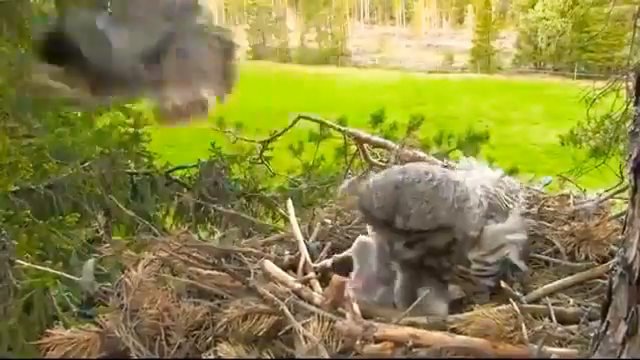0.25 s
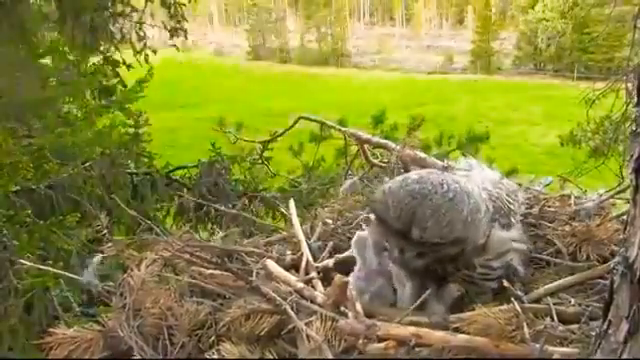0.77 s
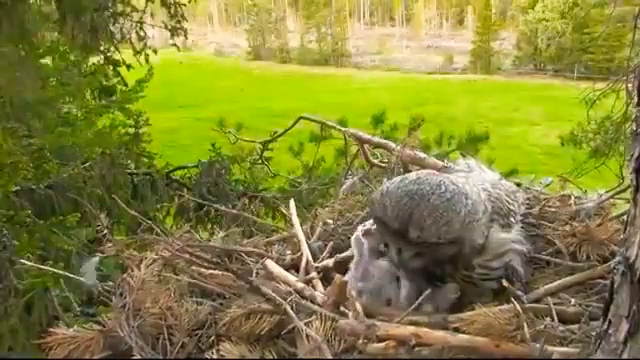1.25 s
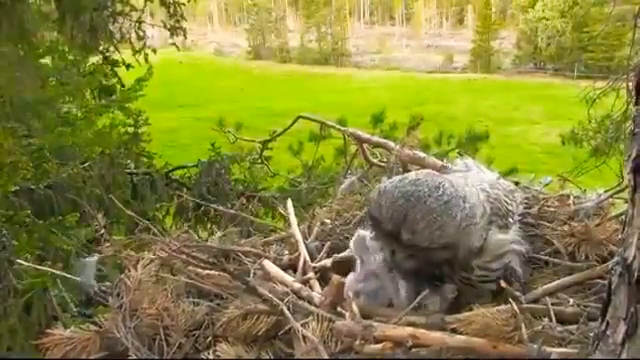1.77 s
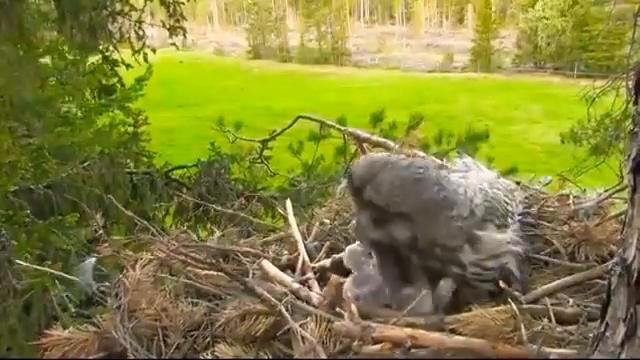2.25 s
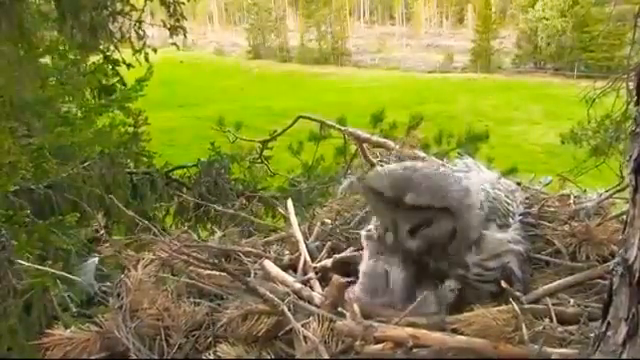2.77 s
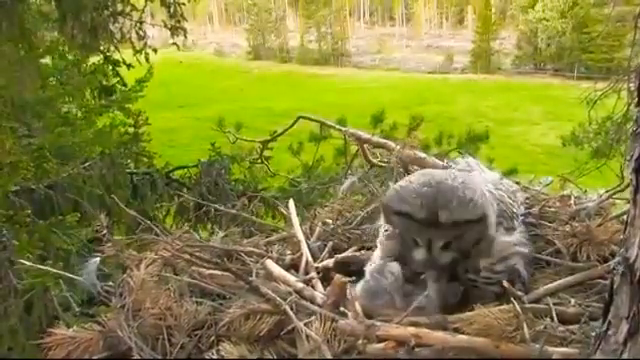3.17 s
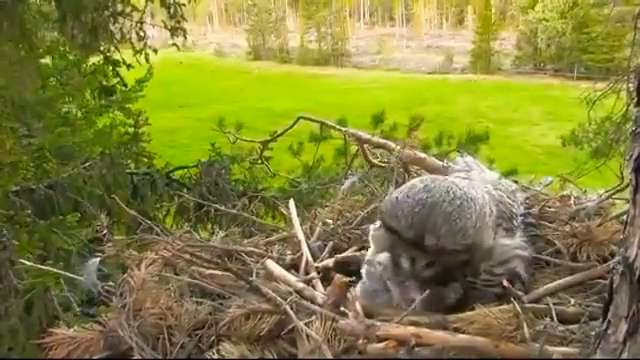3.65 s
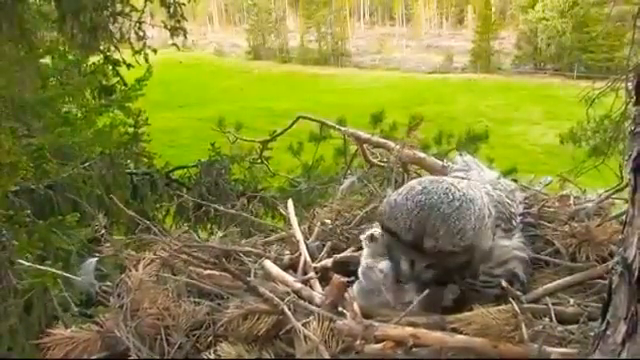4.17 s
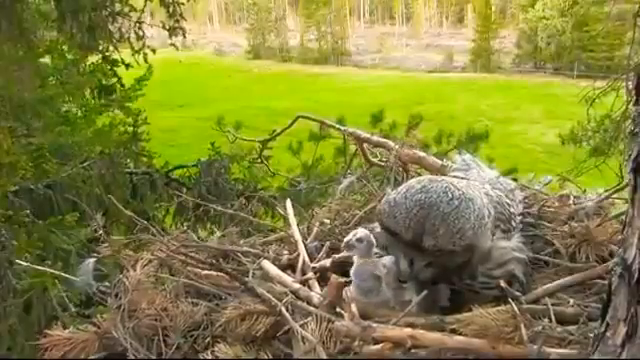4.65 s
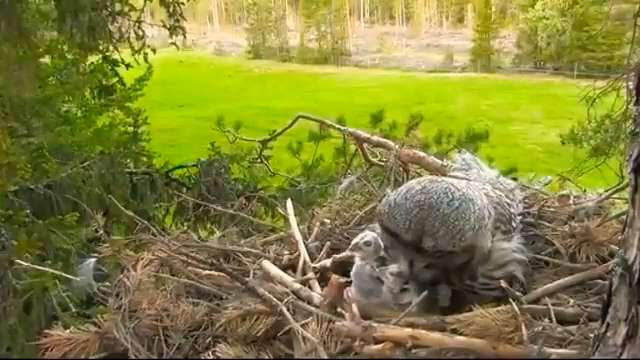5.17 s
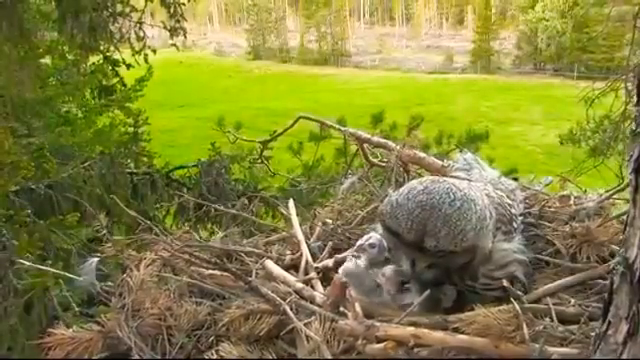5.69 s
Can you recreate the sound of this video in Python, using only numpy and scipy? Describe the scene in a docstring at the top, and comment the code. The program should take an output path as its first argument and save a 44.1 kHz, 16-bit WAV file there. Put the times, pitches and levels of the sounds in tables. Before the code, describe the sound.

Close, dry chick chatter and high rasping begging cries, with brief low wing buffets at the start, over a very quiet forest edge.

```python
"""A forest edge, close to a stick nest: owl chicks beg while an adult flies off, its wings pushing air onto the microphone.
A quick chitter of swooping squeaks and grunts runs, with gaps, through the first three seconds.
Arched whistles with turbulent rasp lie over it, some as hoarse screeches; reedy lower voices sound under or after
some calls or as short separate notes. Gusts and buffets are shaped low noise and short tones; reflections and short
tails set the birds among twigs and trunks. Nearly all of the sound is in the right channel."""
import sys
import numpy as np
from scipy import signal
from scipy.fft import rfft, irfft
from scipy.io import wavfile

SR = 44100
rng = np.random.default_rng(int(sys.argv[2]) if len(sys.argv) > 2 else 0)


def dump(signal):
    """Clip the signal to [-1, 1] and save it as 16-bit WAV at the path in sys.argv[1]."""
    limited = np.clip(np.atleast_2d(signal).T, -1, 1)
    pcm = np.round(limited * 32767).astype(np.int16)
    wavfile.write(sys.argv[1], SR, pcm)


N = 261292
TIME = np.arange(N) / SR
# source levels in dB stand ahead of the right channel's gain


def from_db(db):
    """Decibels to gain."""
    return 10 ** (np.asarray(db) / 20)


def rms_one(x):
    """Scale to unit rms."""
    return x / np.sqrt(np.mean(np.abs(x) ** 2) + 1e-20)


def at_hz(colour, hz):
    """Gain of a spectrum at the given frequencies."""
    points, db = np.transpose(colour)
    return from_db(np.interp(np.log(hz), np.log(points), db))


def noise(colour, size=N):
    """Noise with a given spectrum, falling away below its first point, rms 1."""
    bins = np.maximum(np.arange(size // 2 + 1) * SR / size, 1)
    gain = at_hz(colour, bins) * np.minimum(bins / colour[0][0], 1) ** 2
    return rms_one(irfft(rfft(rng.standard_normal(size)) * gain, size))


def wobble(rate_hz, size):
    """Random motion up to a given rate, rms 1."""
    sos = signal.butter(2, min(rate_hz, SR / 4), fs=SR, output="sos")
    run_in = SR // 10
    return rms_one(signal.sosfilt(sos, rng.standard_normal(size + run_in))[-size:])


def phase_of(hz):
    """Running phase of a moving pitch, from a random start."""
    return 2 * np.pi * (np.cumsum(hz) / SR + rng.random())


def swell(t, half_length):
    """A bell-shaped rise and fall about t = 0."""
    return np.exp(-.5 * (t / half_length) ** 2)


def step(t, duration_s):
    """A smooth step from 0 to 1 about t = 0."""
    return .5 + .5 * np.tanh(.5 * t / duration_s)


def ramp(t, duration_s):
    """1 at t = 0, easing to 0 after the given time."""
    return np.clip(1 - t / duration_s, 0, 1) ** 1.45


def stretch(start_s, length_s):
    """The samples that a sound spans, the time since its start, and its progress from -1/2 to 1/2."""
    t = TIME[:int(length_s * SR)]
    first = int(start_s * SR)
    return slice(first, first + len(t)), t, t / length_s - .5


def blend(share, *pairs):
    """Values part of the way between the two ends of each pair."""
    return [a + np.clip(share, 0, 1) * (b - a) for a, b in pairs]


def forest():
    """The quiet forest in the distance: steady noise, strongest in the lows."""
    # spectrum of the forest air: f/Hz, relative level per Hz/dB
    forest_colour = [(15, -30.5), (25, -9.5), (64, -8), (86, -4), (156, -2), (204, -11), (260, -8),
                     (340, -12.5), (421, -11), (631, -14.5), (703, -12.5), (945, -13.5), (2920, -33.5),
                     (10400, -40.5), (15500, -38)]
    return from_db(-59.5) * noise(forest_colour)


def swoop(t, squeak_hz, hurry, squeak_db, rasp_db):
    """One chitter note: a U of pitch whose overtones and hiss pass through the throat's resonances."""
    # throat resonances: f/Hz, relative level per Hz/dB
    throat = [(250, 1), (620, -19), (1000, -5), (1600, -5), (2100, -10.5), (3000, -10), (3600, -2.5),
              (4600, 1.5), (5400, -4.5), (6200, -16.5), (7300, -15.5), (8300, -26), (9200, -38.5),
              (15000, -36)]
    hurry = np.clip(hurry, 0, 1)
    # pairs are (drawn-out note, hurried note)
    dive_lead_s, drop_octaves = blend(hurry, (0.016, .0165), (0.17, 1.7))
    squeak_half_s, peak_db, glide_db = blend(hurry, (0.0079, 0.0029), (0, 3), (-25, -22))
    hiss_in_db, hiss_squeak_db, hiss_out_db = blend(hurry, (0.5, 5), (-2.5, -4), (-4, -5))

    # the pitch dives onto the squeak, drops below it and climbs out again, sagging throughout
    dive = 2.05 * step(-t - dive_lead_s, .0018)
    sag = 5.5 * t  # octaves, at 5.5 per second
    drop = drop_octaves * step(t - 0.0061, 0.001608)
    climb = (drop_octaves + 2.1) * step(t - 0.024, .0028)
    hz = squeak_hz * 2 ** (dive - sag - drop + climb)
    jitter = .045 * (1 + .5 * hurry)
    phase = phase_of(hz * (1 + jitter * wobble(600, len(t))))

    overtones = np.zeros(len(t))
    for k in range(2, 8):
        flicker = from_db(3 * wobble(120, len(t)))
        audible = k * hz < SR / 2
        overtones += np.sin(k * phase) * at_hz(throat, k * hz) * audible * flicker
    hiss_share = 0.26
    rasp = (np.sqrt(1 - hiss_share) * from_db(-4) * overtones
            + np.sqrt(hiss_share) * noise(throat, size=len(t)))
    rasp = rasp * rms_one(from_db(3.7 * wobble(253, len(t))))

    # the tone peaks on the squeak and stays faint on the way in and out
    tone_level = from_db(peak_db) * swell(t, squeak_half_s) + from_db(glide_db)
    # the rasp bursts as the pitch dives, on the squeak and as it climbs
    rasp_level = (from_db(hiss_in_db) * swell(t + .011, 0.0057)
                  + from_db(hiss_squeak_db) * swell(t, squeak_half_s)
                  + from_db(hiss_out_db) * swell(t - .02, 0.0057))
    tone = np.sqrt(2) * np.sin(phase) * from_db(squeak_db) * tone_level
    note = tone + rasp * from_db(rasp_db) * rasp_level
    # the note spans 28 ms before its squeak to 37 ms after
    return note * (1 - ramp(t + 0.028, 0.016)) * (1 - ramp(.037 - t, 0.01205))


def grunt(t, half_s, hz):
    """A few slow cycles of the slack membrane, sagging in pitch, each letting out a tiny puff."""
    # spectrum of a puff: f/Hz, relative level per Hz/dB
    puff_colour = [(400, 2), (1200, 4), (2200, -15), (4500, -11.5), (6500, -19), (12000, -43)]
    phase = phase_of(hz * np.exp(-0.088 * np.clip(t / half_s, -3, 3)))
    puffs = np.maximum(np.cos(phase), 0) ** 6 * noise(puff_colour, size=len(t))
    puff_level = from_db(-11) * (hz / 300) ** 4  # stronger in a higher grunt
    return np.sqrt(2) * (np.cos(phase) + puff_level * puffs) * swell(t, half_s)


def chitter():
    """Runs of swoops, about ten a second, each with a low grunt of its own."""
    # chitter notes: squeak t/s, squeak f/Hz, hurry (0-1), squeak level/dB, rasp level/dB,
    # grunt delay/s, grunt half-length/s, grunt mid f/Hz, grunt level/dB
    chitter_notes = [(-.012, 1430, 0.99, -30.5, -28, 0.049, 0.0023, 259, -53),
                     (0.088, 1368, 1, -45, -29, .011, 0.0014, 337, -20.5),
                     (0.189, 1340, 0.96, -36.5, -34.5, 0.015, 0.0048, 284, -44),
                     (0.244, 1300, 1, -43.5, -49, 0.022, 0.0034, 217.4, -33.5),
                     (0.604, 1064, 0.88, -44.5, -52.5, -.004, 0.0022, 240.3, -28),
                     (0.698, 1300, 0.83, -35, -37, 0.0098, 0.004, 282, -44.5),
                     (.801, 1371, 0.94, -35.5, -30.5, 0.014, 0.004, 290, -38),
                     (0.905, 1396, 1, -32.5, -34, 0.011, 0.0025, 299, -35),
                     (1.009, 1381, 0.97, -33.5, -32, 0.014, 0.0042, 290.3, -36.5),
                     (1.116, 1380, 1, -35, -29.5, 0.012, 0.0044, 284, -36.5),
                     (1.223, 1409, 1, -36.5, -30.5, 0.015, 0.0029, 310, -33),
                     (1.328, 1380, 1, -34.5, -32, 0.013, 0.0031, 307, -31),
                     (1.435, 1344, 0.95, -36, -30.5, 0.017, 0.0032, 309.5, -32),
                     (1.54, 993, 0.04, -40, -50, 0.041, 0.011, 231, -34),
                     (2.094, 1186, 0, -38, -37.5, 0.011, 0.014, 326, -74),
                     (2.198, 1154, 0.01, -34.5, -43, -0.0023, 0.011, 330, -57),
                     (2.298, 1198, 0.16, -33.5, -43.5, -0.00012, 0.011, 347, -54),
                     (2.399, 1267, 0.11, -34, -39, -0.007, 0.0068, 304.3, -50),
                     (2.501, 1273, 0.19, -36.5, -40.5, 0.018, 0.0073, 277.2, -49.5),
                     (2.608, 1285, 0.45, -35.5, -42, 0.017, 0.0044, 267, -43),
                     (2.714, 1268, 0.32, -34.5, -39, 0.016, 0.0047, 245.6, -52.5),
                     (2.815, 1275, 0.3, -35.5, -39, 0.01, 0.0099, 280, -52.5),
                     (2.923, 1280, 0.23, -36, -48, .014, 0.0053, 270, -45),
                     (3.027, 1013, 0.08, -37, -46, 0.05, 0.0081, 198.4, -48)]
    out = np.zeros(N)
    for s, hz, hurry, squeak_db, rasp_db, delay_s, half_s, low_hz, low_db in chitter_notes:
        near = np.abs(TIME - s) < .1
        t = TIME[near] - s
        out[near] += swoop(t, hz, hurry, squeak_db, rasp_db)
        out[near] += from_db(low_db) * grunt(t - delay_s, half_s, low_hz)
    return out


def wings():
    """Low gusts rise quickly and die away, with a buffet where a wing stroke's air hits the microphone."""
    # gusts of air over the microphone: peak t/s, level/dB, time to fall 60 dB/s
    gusts = [(0, -49, 2.3), (.34, -35.5, 1.45), (.61, -40, 0.22), (5.06, -49.5, 1.12)]
    # wing buffets: t/s, f/Hz, half-length/s, level/dB
    buffets = [(.005, 288, 0.0014, -29.5), (0.382, 125, 0.0024, -26.5), (0.456, 69.5, 0.008, -33),
               (0.488, 51.75, 0.0032, -27), (0.616, 67.4, 0.0074, -24)]
    # spectrum of the draught: f/Hz, relative level per Hz/dB
    draught_colour = [(15, -11.5), (30, 3.5), (52, 3), (85, -7.5), (130, -16.5), (250, -24.5), (600, -56)]
    draught = np.zeros(N)
    for s, db, t60 in gusts:
        rise = swell(np.minimum(TIME - s, 0), 0.037)
        draught += from_db(db - 60 * np.maximum(TIME - s, 0) / t60) * rise
    out = draught * noise(draught_colour)
    for s, hz, half_s, db in buffets:
        tone = np.sin(2 * np.pi * (hz * TIME + rng.random()))
        out += np.sqrt(2) * from_db(db) * swell(TIME - s, half_s) * tone
    return out


def undertone(row):
    """A reedy lower voice on a shallow arch of pitch, whose overtones flicker and change as it is pressed."""
    # harmonics of the voice from the fundamental up, overtones ahead of their boost: level/dB
    harmonics_db = [-2, -2, -2, -5, -6, -31]
    start_s, length_s, start_hz, end_hz, arch_hz, level_db, swell_db, boost_db, boost_change_db = row
    span, t, progress = stretch(start_s, length_s)
    hz = start_hz + (end_hz - start_hz) * t / length_s + arch_hz * (1 - (2 * progress) ** 2)
    size, out = len(hz), np.zeros(N)
    phase = phase_of(hz * (1 + 0.031 * wobble(391, size)))
    pressed_db = boost_db + boost_change_db * progress
    voice = np.zeros(size)
    for k, db in enumerate(harmonics_db, 1):
        if k > 1:
            db = db + pressed_db + 4 * wobble(65, size)
        voice += np.sin(k * phase) * from_db(db)
    edge_s = 0.0017
    edges = (1 - ramp(t, edge_s)) * (1 - ramp(length_s - t, edge_s))
    out[span] = np.sqrt(2) * voice * from_db(level_db + swell_db * progress) * edges
    return out


def beg(row):
    """An arched whistle, mostly thinner at its top; roughness shakes it, and turbulent rasp surrounds it."""
    # spectra of the rasp in a clear and in a hoarse call: f/Hz, relative level per Hz/dB
    peep_rasp = [(700, -7), (1300, -3), (1900, -7), (2900, 8), (4500, 10.5), (6500, 2), (8000, -0.5),
                 (8800, -14), (10400, -10.5), (11300, -37), (13000, -16), (15500, -29.5)]
    screech_rasp = [(300, -14.5), (700, -11.5), (1200, -4), (2600, -8.5), (4500, -8.5), (6000, 10),
                    (7800, 9), (8800, -2.5), (10400, -2), (11400, -7), (14000, -1), (15700, -20.5)]
    (start_s, rise_s, fall_s, start_hz, top_hz, end_hz, steepness, hoarse, attack_s,
     tone_db, tone_swell_db, thin_db, accent_db, surge_db, hiss_db, hiss_swell_db) = row
    hoarse = np.clip(hoarse, 0, 1)
    # pairs are (clear call, hoarse call)
    release_s, = blend(hoarse ** 3, (0.0075, 0.059))
    rough, rough_growth = blend(hoarse, (.3, .48), (.4, -.2))
    chaos_share, rasp_lag = blend(hoarse, (0.069, 0.43), (1.12, 0.25))

    span, t, progress = stretch(start_s, rise_s + fall_s)
    left_s = rise_s + fall_s - t
    rise_hz = (top_hz - start_hz) * np.maximum(1 - t / rise_s, 0) ** steepness
    fall_hz = (top_hz - end_hz) * np.maximum(1 - left_s / fall_s, 0) ** 1.5
    hz = top_hz - rise_hz - fall_hz
    strain = np.exp(-np.abs(top_hz - hz) / 901.7)  # 1 at the top of the arch

    # a call swells from 22 dB down; a last push comes just before the end
    attack_depth_db = 22
    push_db = surge_db * swell(left_s - .016, 0.0099)
    release_db = 28 * ramp(left_s, release_s)
    accent = accent_db * swell(t - attack_s, .004)
    whistle_db = (tone_db + tone_swell_db * progress - thin_db * strain + accent
                  + push_db - attack_depth_db * ramp(t, attack_s) - release_db)
    rasp_db = (hiss_db + hiss_swell_db * progress + 0.5 * push_db
               - attack_depth_db * ramp(t, 0.01 + rasp_lag * attack_s) - 0.59 * release_db)

    # a clear call turns rougher at the top of its arch
    rough = np.clip(rough + rough_growth * progress + 0.15 * strain * (1 - hoarse), 0, 1)
    size, out = len(hz), np.zeros(N)
    # a rough whistle breaks up into fragments, less so the hoarser the call
    whistle_db = whistle_db + 4.5 * rough * (1 - hoarse) * (wobble(90, size) - .5)
    phase = phase_of(hz * (1 + 0.07 * rough * wobble(700, size) + 0.0084 * wobble(90, size)))
    octave = from_db(-29) * np.sin(2 * phase) * wobble(900, size)
    whistle = np.sqrt(2) * (np.sin(phase) + octave) * from_db(whistle_db)

    # part of the rasp is chaotic motion of the membrane, so it follows the pitch
    skirt_hz = 1120
    chaos = wobble(skirt_hz, size) * np.sin(phase) + wobble(skirt_hz, size) * np.cos(phase)
    hiss = (np.sqrt(1 - hoarse) * noise(peep_rasp, size=size)
            + np.sqrt(hoarse) * noise(screech_rasp, size=size))
    rasp = (np.sqrt(chaos_share) * chaos + np.sqrt(1 - chaos_share) * hiss) * from_db(rasp_db)
    flutter = rms_one(from_db(3.5 * rough * np.minimum(wobble(220, size), 1)))
    out[span] = (whistle + rasp) * flutter * signal.windows.tukey(size, .02)
    return out


def forest_echo(x):
    """Near surfaces reflect the calls; twigs and the forest beyond scatter short tails."""
    # reflections from near surfaces: delay/s, level/dB
    reflections = [(.0012, -26.5), (.0029, -27), (.0047, -23), (.0083, -25.5)]
    # scattered tails: time to fall 60 dB/s, level/dB, treble level at 15 kHz against the lows/dB
    tails = [(.11, -12, 5), (0.401, -33.5, -32.5)]
    response = np.zeros(SR)
    for t60, db, treble_db in tails:
        tail_colour = [(100, 0), (5000, 0), (15000, treble_db)]
        tail = noise(tail_colour, size=SR) * from_db(-60 * TIME[:SR] / t60)
        response += from_db(db) * tail / np.sqrt(np.sum(tail ** 2))
    for delay_s, db in reflections:
        response[int(delay_s * SR)] += from_db(db)
    return signal.fftconvolve(x, response)[:N]


def scene():
    """The birds close by, the wing draught and the quiet forest, all on one microphone."""
    # arches of pitch in the begging calls; the one at 5.008 s is the broken start of the next:
    # start t/s, rise/s, fall/s, start f/Hz, top f/Hz, end f/Hz,
    # steepness of the rise, hoarseness (limited to 0-1), attack/s, whistle level/dB, whistle swell/dB,
    # whistle loss at the top/dB, opening accent/dB, closing surge/dB, rasp level/dB, rasp swell/dB
    begging_arches = [(.8, 0.03, 0.087, 6400, 6570, 6100, 1.4, 0, .03, -54.5, -2.5, 1.5, 0, 0, -59.5, 3),
                      (0.957, .1, 0.086, 3580, 8560, 4410, 2.3, 0.13, 0.0043, -48, 30, 5, 9, 4.5, -43, 24.5),
                      (1.664, .095, 0.047, 3700, 7770, 3100, 3.4, 0.05, 0.014, -32.5, -16.5, 5, 2.5, 2, -35.5, -1),
                      (2.0308, 0.054, 0.064, 4140, 7040, 3024, 4.2, 0, 0.0014, -35.5, -8, 10, 7.5, 9.5, -39.5, -4.5),
                      (4.594, .109, .041, 3220, 6780, 3780, 1.67, 0.06, 0.031, -30.5, -5.5, 7, -1, 3.5, -42, 10),
                      (5.008, 0.023, 0.009, 4230, 4475, 4400, 1.9, 0.02, .008, -35.5, 2.5, -1.5, -2, -2.5, -50, 0),
                      (5.029, 0.054, .042, 5360, 6860, 2573, 1.7, 0.09, 0.0038, -31, -1.5, 1, 1, 1, -37, 5),
                      (2.446, 0.11, .082, 5517, 7730, 5410, 1.7, 0.96, 0.032, -24.5, 8, -0.5, -7, 5, -24.5, 10.5),
                      (2.895, 0.095, 0.085, 5505, 7480, 4910, 1.44, 1.01, 0.019, -20, 1, 2, -5.5, 1.5, -25, -2),
                      (3.286, 0.075, 0.13, 3800, 7860, 5300, 3.2, 0.6, .008, -35, 24, 18.5, 1.5, 3.5, -39.5, 28)]
    # lower voices, some under or after calls, others short separate notes among the chitter:
    # start t/s, length/s, start f/Hz, end f/Hz, arch/Hz, level/dB, swell/dB, overtone boost/dB, boost change/dB
    lower_voices = [(0.073, 0.011, 2280, 2010, 35, -34.5, -1, -26, 8),
                    (0.213, 0.039, 2840, 2160, 404, -53.5, -4, -18, 8),
                    (1.973, 0.028, 915, 1070, -111, -40.5, 5.5, -19.5, 4.5),
                    (2.115, .02, 1477, 1492, 35, -37.5, -8, -1, 7),
                    (2.449, .18, 1394, 1657, 438.5, -45, -0.5, -4.5, -2),
                    (2.899, 0.17, 1402, 1727, 399, -45, -3.5, -3, 13.5),
                    (3.443, .047, 1778, 1394, -90.5, -41, 15, 3.5, -24.5),
                    (3.489, 0.059, 1305, 990, 87, -48.5, 1.5, -11.5, -5.5),
                    (5.009, .014, 2995, 3050, -25.5, -45, -1.5, -25.5, -4),
                    (5.112, 0.031, 1614, 1110, 11, -58, 3, 2, -8)]
    # spectrum of the faint noise on the left: f/Hz, relative level per Hz/dB
    left_colour = [(20, -5), (150, -9.5), (500, -17), (2000, -11), (15000, -17.5)]
    birds = chitter()
    birds += sum(undertone(row) for row in lower_voices)
    birds += sum(beg(row) for row in begging_arches)
    microphone = birds + forest_echo(birds) + wings() + forest()
    # the left channel carries only a thin leak of the microphone and a faint steady noise
    thin = signal.butter(1, 118, "high", fs=SR, output="sos")
    leak = signal.sosfilt(thin, microphone)
    left = from_db(-37) * leak + from_db(-71) * noise(left_colour)
    right = from_db(6) * microphone
    return np.array([left, right])


def record(dry):
    """The recorder cuts the top steeply, above 15.8 kHz."""
    steep_cut = signal.ellip(12, .1, 90, 15800, fs=SR, output="sos")
    return signal.sosfilt(steep_cut, dry)


dry = scene()
out = record(dry)
dump(out)
```